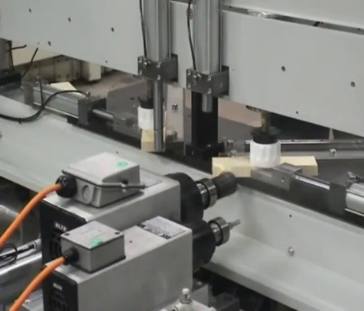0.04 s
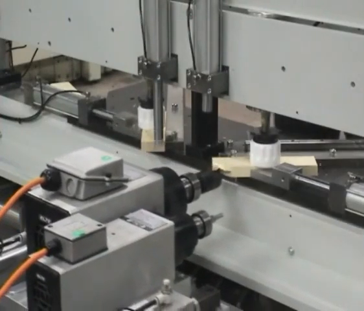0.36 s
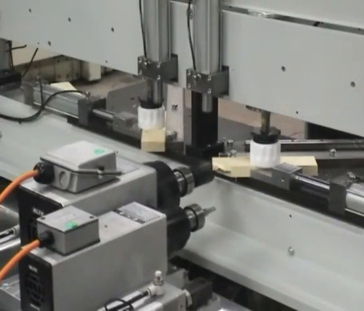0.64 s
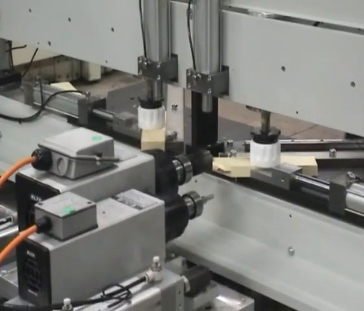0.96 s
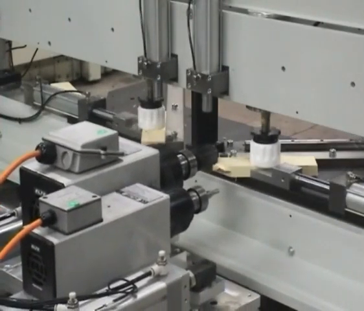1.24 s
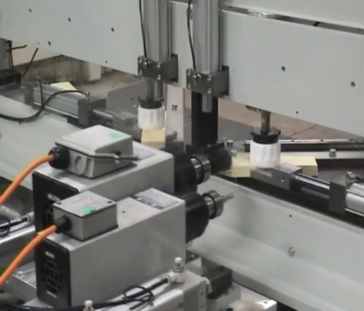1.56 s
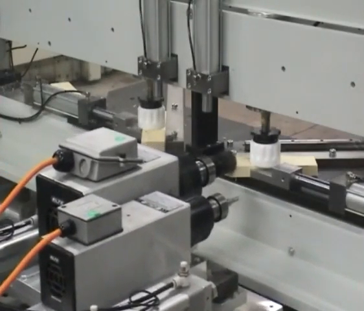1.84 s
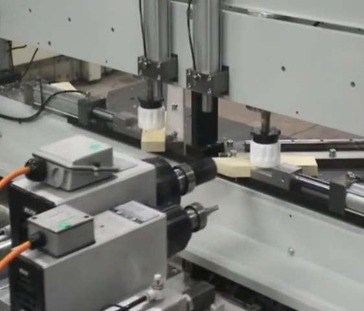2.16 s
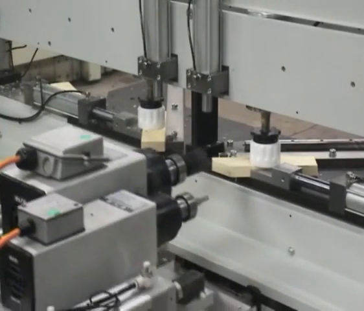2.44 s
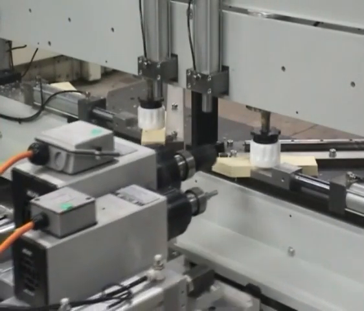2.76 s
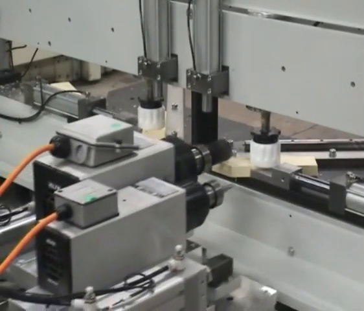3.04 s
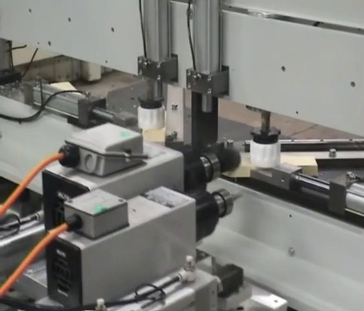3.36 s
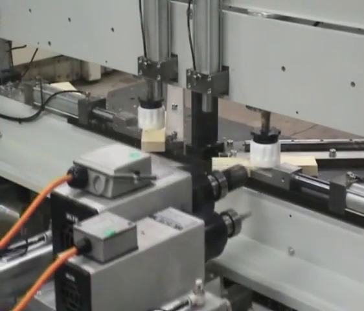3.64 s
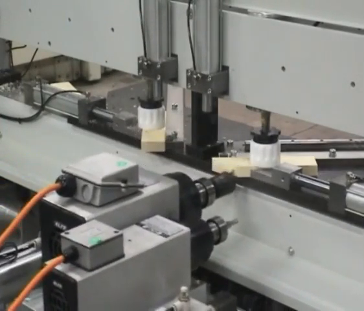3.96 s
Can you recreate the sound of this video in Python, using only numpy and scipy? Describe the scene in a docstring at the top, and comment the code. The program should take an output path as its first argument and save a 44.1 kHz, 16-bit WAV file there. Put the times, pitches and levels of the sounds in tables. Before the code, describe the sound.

Machine drilling into wood, three buzzing, squealing cuts close by, with motor hum and air hiss.

```python
"""A two-edged bit buzzes and squeals in wood: a drilling machine at close range, three cuts.
The edges strike the wood, buzzing once a turn and squealing on multiples of the bit's speed.
It chatters where it is loaded most; chips and torn fibres hiss with the cuts.
Behind it, spindle motors hum on multiples of 100 Hz over a rush of air."""
import sys
import numpy as np
from scipy.fft import rfft, irfft, next_fast_len
from scipy.io import wavfile
from scipy.ndimage import map_coordinates

SR = 44100
rng = np.random.default_rng(int(sys.argv[2]) if len(sys.argv) > 2 else 0)


def master_out(mix):
    """Clip the mix to full scale and print it as 16-bit PCM to the path in sys.argv[1]."""
    frames = np.transpose(np.atleast_2d(mix))
    ceiling = np.clip(frames, -1, 1)
    pcm = np.round(ceiling * 32767).astype(np.int16)
    wavfile.write(sys.argv[1], SR, pcm)


N = 176400

# bit speed (time [s], speed [turns/s])
BIT_SPEED_HZ = [(0, 298.9), (.17, 298.4), (.27, 295.5), (.48, 297.3), (.75, 297), (.95, 298.9),
                (1.65, 298.3), (2, 299.2), (3.38, 299.2), (3.55, 298.2)]
# buzz, one table per cut (time [s], level [dB], odd re even multiples [dB])
CUT_LEVELS_DB = [
    [(0, -19, 0), (.17, -14.5, -2.5), (.27, -16, -9.5), (.44, -17.5, -3.5), (.6, -24, -22), (.8, -31, -16)],
    [(.85, -22, -8), (1.13, -17.5, 0), (1.25, -18.5, -2.5), (1.6, -18, -4.5), (1.72, -19.5, -8),
     (2.1, -26, -24)],
    [(3.42, -18.5, -4.5), (3.62, -19, -1), (3.78, -15, -2), (4, -16.5, -2)],
]
# buzz spectrum (frequency [Hz], relative level per multiple [dB])
BUZZ_SPECTRUM_DB = [(600, -3), (2400, 6), (4000, -1.5), (6000, -2), (10700, -2), (15500, -10)]
# squeal at 6 x bit speed (time [s], level [dB])
SQUEAL_6_DB = [(0, -29), (.08, -15), (.26, -6), (.33, -17.5), (.46, -10.5), (.52, -34), (.6, -14),
               (.68, -31), (1, -30.5), (1.4, -20.5), (1.55, -24), (1.65, -60)]
# squeal at 8 x bit speed (time [s], level [dB])
SQUEAL_8_DB = [(0, -22), (.06, -14.5), (.18, -16.5), (.24, -36), (.3, -26), (.35, -15.5), (.52, -15.5),
               (.62, -26), (.8, -31), (1.18, -9.5), (1.52, -12.5), (1.63, -52)]
# short squeals (start [s], end [s], multiple of bit speed [-], level [dB])
SHORT_SQUEALS = [(0.206, 0.305, 12, -24), (.28, .5, 24, -23), (.305, .375, 22, -20), (0.747, .8, 6, -22.5),
                 (.89, .95, 6, -24), (1.146, 1.29, 12, -24), (1.183, 1.333, 16, -25),
                 (1.179, 1.457, 24, -17.5), (1.48, 1.62, 24, -23), (1.478, 1.595, 12, -21.5),
                 (1.516, 1.624, 16, -17.5), (1.506, 1.65, 28, -18.5), (1.57, 1.76, 18, -26),
                 (1.632, 1.669, 10, -19.5), (1.636, 1.746, 12, -22), (1.71, 1.816, 10, -19),
                 (3.427, 3.458, 12, -21.5), (3.432, 3.47, 18, -20.5), (3.455, 3.517, 10, -15),
                 (3.52, 3.607, 10, -27.5), (3.527, 3.89, 18, -25), (3.747, 4.1, 8, -21.5),
                 (3.8, 3.98, 10, -21), (3.853, 4.1, 20, -21)]
# spells of chatter (centre [s], sigma [s], level [dB])
CHATTER_SPELLS = [(0.34, 0.046, -18), (1.605, 0.061, -17.5), (3.444, 0.019, -23), (3.676, .13, -25.5)]
# chatter spectrum (frequency [Hz], relative level [dB])
CHATTER_SPECTRUM_DB = [(3600, -7), (5500, -8), (6800, 0), (9000, -5.5), (14500, -10)]
# bursts of tearing fibres (centre [s], sigma [s], level [dB])
FIBRE_BURSTS = [(0.33, 0.1, -31), (1.62, 0.017, -18.5), (3.447, 0.029, -21.5)]
# chip and fibre hiss spectrum (frequency [Hz], relative density [dB])
HISS_SPECTRUM_DB = [(500, -27), (4500, -2.5), (10500, 2), (15500, -6)]
# main motor tones (time [s], 3rd multiple [dB], 4th multiple [dB], 9th multiple [dB])
HUM_LEVELS_DB = [(0, -17.5, -17, -15), (.15, -22, -27.5, -29), (.32, -41, -39.5, -41),
                 (.43, -28, -32, -29.5), (.62, -23, -20.5, -26.5), (.8, -17, -17.5, -21.5),
                 (1.13, -20, -20, -35), (1.23, -29, -27, -30), (1.58, -32, -28.5, -32),
                 (1.9, -21, -27.5, -29.5), (2.8, -18, -27, -29), (3.05, -19, -22, -27),
                 (3.4, -16.5, -18.5, -22), (3.51, -20.5, -21.5, -19.5), (3.72, -18.5, -15.5, -22.5),
                 (3.86, -22, -19.5, -16), (4, -21, -24, -24.5)]
# weak motor tones (multiple [-], level [dB])
WEAK_HUM_DB = [(6, -37.5), (7, -39), (8, -38.5), (11, -42), (16, -41.5)]
# air rush (time [s], level [dB])
AIR_LEVEL_DB = [(0, -18), (.2, -29), (.5, -22.5), (.7, -21), (1.14, -20), (1.23, -32), (1.4, -30.5),
                (1.7, -25), (2.1, -22.5), (3.35, -17.5), (3.55, -18.5), (3.73, -17.5), (4, -23.5)]
# air spectrum (frequency [Hz], relative density [dB])
AIR_SPECTRUM_DB = [(60, -30), (120, -18.5), (200, -23), (290, -1), (530, -1.5), (1300, 0.5), (2100, 3.5),
                   (3000, -0.5), (4300, -5), (7000, -3), (9500, -7), (15500, -16.5)]
# left-right likeness (frequency [Hz], correlation [-])
STEREO_CORRELATION = [(200, .99), (3000, 0.9), (8000, 0.82), (13000, 0.44)]
# stereo balance (frequency [Hz], left minus right [dB])
BALANCE_DB = [(350, -.8), (1600, -1.4), (5000, 0)]


def bit(turns, speed_hz, top_multiple=52, waver_db=3.5, stutter_db=2.8):
    """Edges strike the wood: multiples of the speed buzz, some squeal, high ones stutter when rough."""
    (even, odd), rough, squeal_gains = cut_gains(), roughness(), squeals()
    multiples = np.arange(2, top_multiple + 1)
    weights = amp(at_hz(BUZZ_SPECTRUM_DB, multiples * speed_hz.mean()))
    out = 0
    for k, weight in zip(multiples, weights / np.linalg.norm(weights)):
        beat, height = beating(turns, speed_hz, k), k / 20
        waver = unit(amp(waver_db * wobble(11)))
        buzz = weight * (odd if k % 2 else even) * waver * beat
        squeal = squeal_gains.get(k, 0) * beat ** min(height ** 2, 1)
        stutter = unit(amp(stutter_db * rough * min(height, 1) * wobble(70)))
        phase = k * turns + rng.random() + jitter(depth_rad=1.41, rate_hz=3.5)
        phase += rough * np.sqrt(height) * jitter(depth_rad=.42, rate_hz=70)
        out += np.hypot(buzz, squeal) * stutter * tone(phase, k * speed_hz.mean())
    return out


def cut_gains(fade_db_per_s=210):
    """Gains of the even and odd multiples; both fade outside each cut."""
    t, even, odd = clock(), 0, 0
    for cut in CUT_LEVELS_DB:
        level_db, odd_db = curves(cut)
        outside_s = np.abs(t - np.clip(t, cut[0][0], cut[-1][0]))
        gain = amp(level_db - fade_db_per_s * outside_s)
        even += gain
        odd += gain * amp(odd_db)
    return even, odd


def squeals(rise_s=.03, fall_s=.05, arch_db=4.5):
    """Gain per squealing multiple. Short squeals peak midway; skirts are 20 dB per rise or fall time."""
    t = clock()
    gains = {6: amp(curves(SQUEAL_6_DB)[0]), 8: amp(curves(SQUEAL_8_DB)[0])}
    for start_s, end_s, k, level_db in SHORT_SQUEALS:
        fade_db = 20 * (np.maximum(start_s - t, 0) / rise_s + np.maximum(t - end_s, 0) / fall_s)
        droop_db = arch_db * np.interp(t, [start_s, end_s], [-1, 1]) ** 2
        gains[k] = np.maximum(gains.get(k, 0), amp(level_db - droop_db - fade_db))
    return gains


def beating(turns, speed_hz, k, share_per_hz2=.19):
    """Gain of multiple k: slowed by the wood, the bit beats against a second, steady spindle."""
    twin_hz = speed_hz.max()
    share = np.clip(share_per_hz2 * (twin_hz - speed_hz) ** 2, 0, .7)
    slip_turns = k * (twin_hz * clock() - turns) + rng.random()
    return np.sqrt(1 + 2 * share / (1 + share ** 2) * np.cos(2 * np.pi * slip_turns))


def roughness(calm=.34, stretch=2.1):
    """Unsteadiness of the cut: low while the bit rings freely, 1 around chatter."""
    spells = sum(swell(centre_s, stretch * sigma_s) for centre_s, sigma_s, _ in CHATTER_SPELLS)
    return np.clip(calm + spells, 0, 1)


def chatter(turns, speed_hz, flutter_db=2.9):
    """The two edges scrape unevenly as the bit enters, leaves or labours: blurred even multiples."""
    scrape = 0
    for k in range(10, 52, 2):
        hz = k * speed_hz.mean()
        gain = amp(at_hz(CHATTER_SPECTRUM_DB, hz) + 3 * wobble(70))
        phase = k * turns + rng.random() + jitter(depth_rad=.85, rate_hz=120)
        scrape += gain * tone(phase, hz)
    return swells(CHATTER_SPELLS) * unit(scrape * amp(flutter_db * wobble(80)))


def chip_hiss(chips_db=-13.5, grit_db=3.5, flutter_db=1.73):
    """Flying chips hiss with the cut's level and roughness; torn fibres add gritty bursts."""
    chips = amp(chips_db) * cut_gains()[0] * roughness()
    fibres = unit(amp(grit_db * wobble(500))) * swells(FIBRE_BURSTS)
    return (chips + fibres) * amp(flutter_db * wobble(60)) * noise(HISS_SPECTRUM_DB)


def chopping(turns, depth=.15):
    """Gain by which the turning bit chops noise, once and twice a turn."""
    return unit(1 + depth * (np.cos(2 * np.pi * turns) + np.cos(4 * np.pi * turns)) / 2)


def motors(base_hz=99.87):
    """Spindle motors: three strong hum tones, plus weak ones that follow the air level."""
    turns = base_hz * clock() + jitter(depth_rad=.041, rate_hz=5.23)
    third_db, fourth_db, ninth_db = curves(HUM_LEVELS_DB)
    air_db, = curves(AIR_LEVEL_DB)
    levels_db = [(3, third_db), (4, fourth_db + .5 * wobble(9)), (9, ninth_db + wobble(12))]
    levels_db += [(k, db + air_db - air_db.mean() + 3.73 * wobble(7.13)) for k, db in WEAK_HUM_DB]
    return sum(amp(db) * tone(k * turns + rng.random(), k * base_hz) for k, db in levels_db)


def air(chop, treble_from_hz=1500):
    """Rush of air; the bit chops its treble."""
    air_db, = curves(AIR_LEVEL_DB)
    rush = amp(air_db) * noise(AIR_SPECTRUM_DB)
    treble = filtered(rush, lambda hz: np.clip(hz / treble_from_hz - 1, 0, 1))
    return rush - treble + chop * treble


def tone(turns, hz):
    """Stereo sine, rms 1; reflections shift its phase between channels."""
    shift_rad = spread_rad(hz) * rng.choice([-1, 1])
    phase_rad = 2 * np.pi * (turns % 1)
    return np.sqrt(2) * np.sin(np.float32([phase_rad + shift_rad, phase_rad - shift_rad]))


def noise(spectrum_db):
    """Coloured stereo noise, rms 1."""
    def response(hz):
        return amp(at_hz(spectrum_db, hz)) * [np.cos(spread_rad(hz)), np.sin(spread_rad(hz))]
    mid, side = filtered(rng.standard_normal((2, N)), response)
    return unit(np.array([mid + side, mid - side]))


def spread_rad(hz):
    """Half the angle between channels."""
    return np.arccos(np.clip(at_hz(STEREO_CORRELATION, hz), 0, 1)) / 2


def swell(centre_s, sigma_s):
    """Gaussian envelope, peak 1."""
    return np.exp(-.5 * ((clock() - centre_s) / sigma_s) ** 2)


def swells(rows):
    """Sum of Gaussian envelopes at their levels."""
    return sum(amp(db) * swell(centre_s, sigma_s) for centre_s, sigma_s, db in rows)


def wobble(rate_hz):
    """Smooth random curve, rms about 1."""
    coarse_s = clock()[::32]
    knots = rng.standard_normal(4096)
    return np.interp(clock(), coarse_s, map_coordinates(knots, [coarse_s * rate_hz], mode="wrap"))


def jitter(depth_rad, rate_hz):
    """Random phase drift [turns]."""
    return depth_rad * wobble(rate_hz) / (2 * np.pi)


def filtered(x, response):
    """Apply a gain given as a function of frequency."""
    size = next_fast_len(N + SR // 4)
    return irfft(rfft(x, size) * response(np.fft.rfftfreq(size, 1 / SR)), size)[..., :N]


def curves(rows):
    """One per-sample curve for each column after time."""
    times_s, *columns = np.transpose(rows)
    return [np.interp(clock(), times_s, column) for column in columns]


def at_hz(rows, hz):
    """Table lookup on a log frequency axis."""
    knots_hz, values = np.transpose(rows)
    return np.interp(np.log(hz + 1), np.log(knots_hz + 1), values)


def clock():
    """Sample times [s]."""
    return np.arange(N) / SR


def amp(db):
    """dB to gain."""
    return np.exp(np.asarray(db) * (np.log(10) / 20))


def unit(x):
    """Scale to rms 1."""
    return x / np.sqrt(np.mean(x ** 2) + 1e-20)


def scene():
    """Cutting bit over motors and air, slightly to the right."""
    speed_hz, = curves(BIT_SPEED_HZ)
    turns = np.cumsum(speed_hz) / SR
    chop = chopping(turns)
    machine = motors() + chop * chip_hiss() + air(chop) + bit(turns, speed_hz) + chatter(turns, speed_hz)
    return filtered(machine, lambda hz: amp(np.outer([.5, -.5], at_hz(BALANCE_DB, hz))))


def record(dry, top_hz=15750):
    """Clip at full scale, then band-limit."""
    return filtered(np.clip(dry, -1, 1), lambda hz: hz < top_hz)


dry = scene()
out = record(dry)
master_out(out)
```